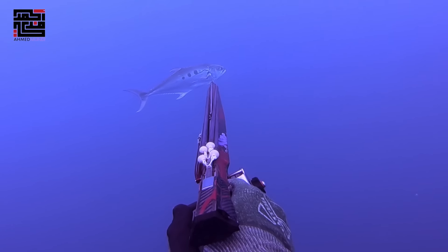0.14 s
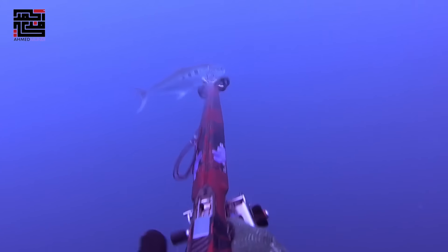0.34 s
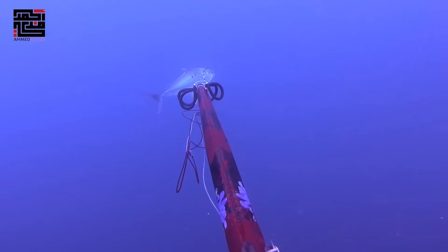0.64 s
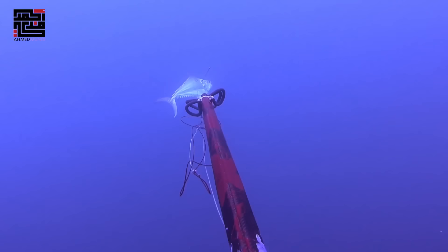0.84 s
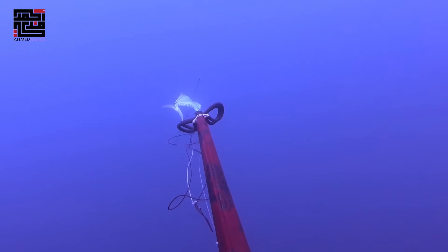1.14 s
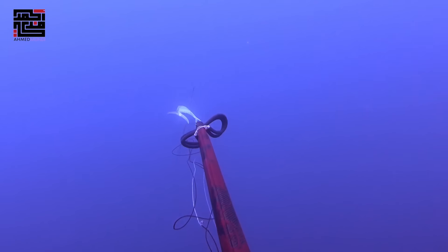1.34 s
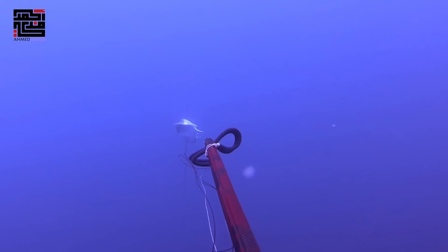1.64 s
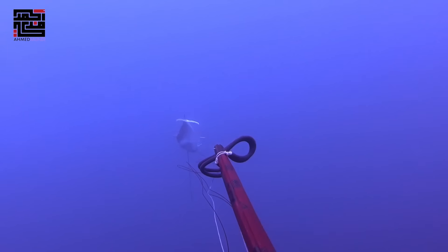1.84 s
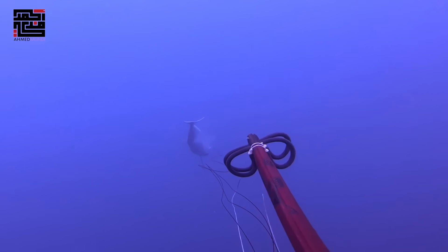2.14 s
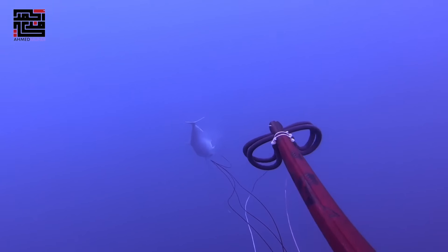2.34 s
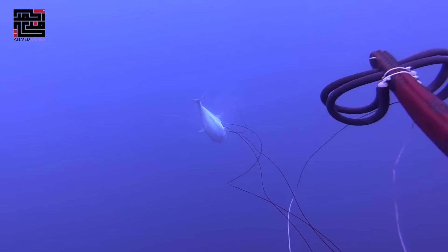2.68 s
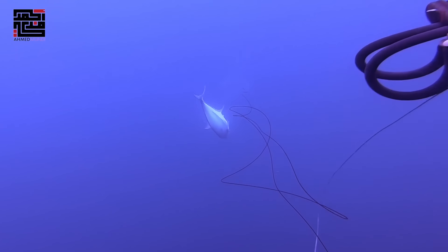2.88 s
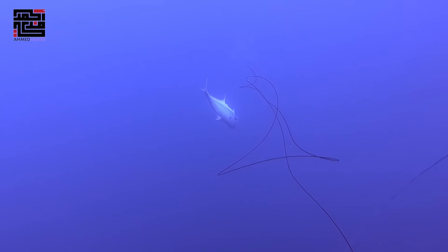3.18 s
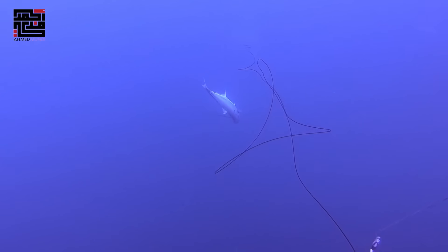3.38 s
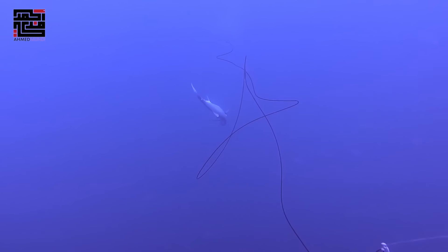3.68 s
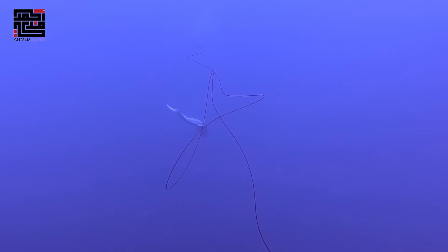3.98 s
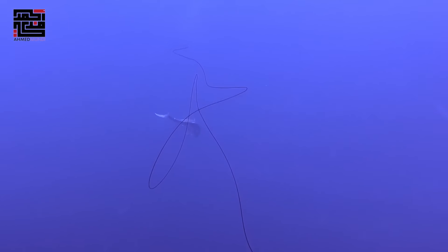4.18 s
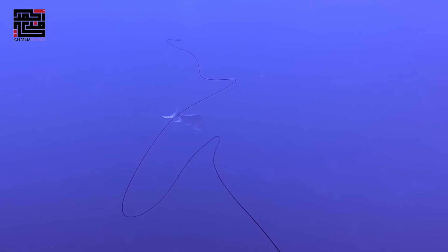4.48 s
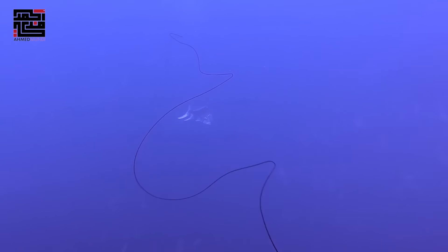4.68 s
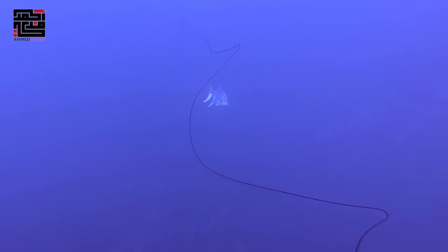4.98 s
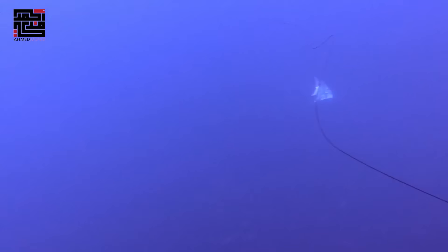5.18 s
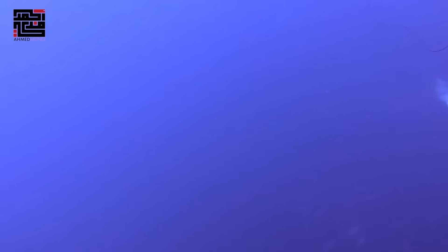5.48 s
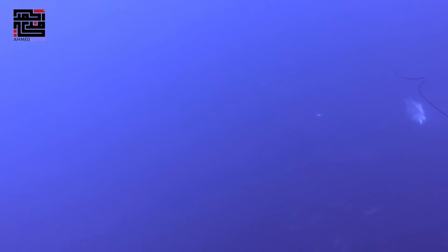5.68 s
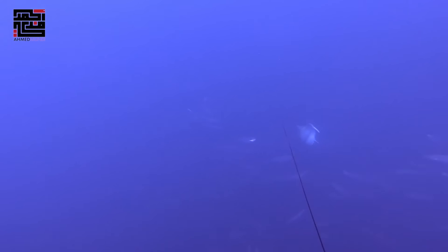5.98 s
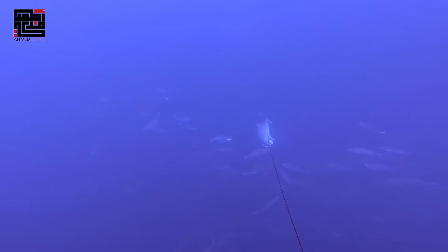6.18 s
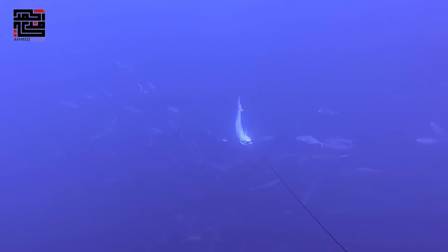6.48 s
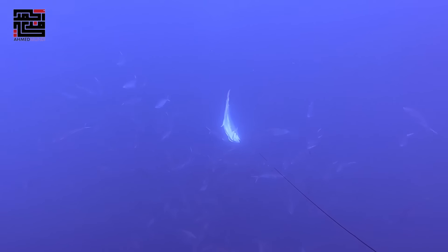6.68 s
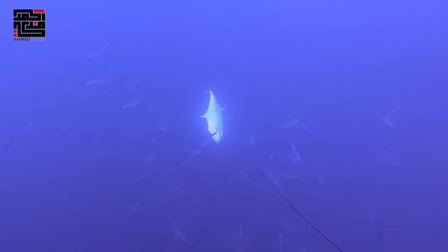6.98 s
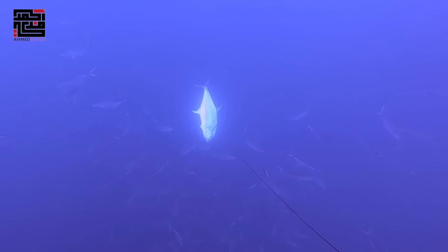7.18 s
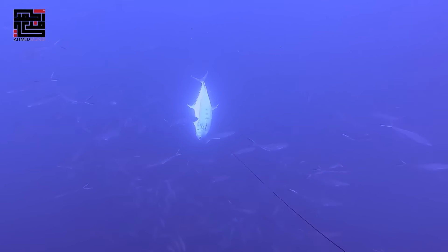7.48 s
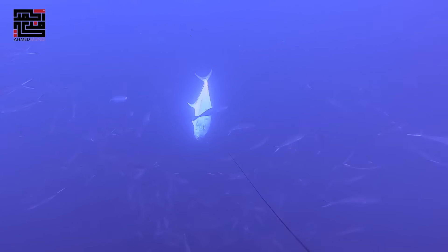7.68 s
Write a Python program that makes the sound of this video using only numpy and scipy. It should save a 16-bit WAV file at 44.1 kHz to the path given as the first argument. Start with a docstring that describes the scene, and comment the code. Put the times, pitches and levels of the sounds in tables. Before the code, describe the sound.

A speargun's abrupt recoil thump opens a muffled underwater hush, followed by sparse housing knocks, a sharp clack near 4.6 seconds, and tiny ticking clicks.

```python
"""A speargun has just fired under water, heard inside a diver's sealed camera housing with two microphone ports.
First the recoil thuds (sudden low waves) and rattles (noise that dies fast) over a thin crackling hiss.
Then the line and gear tap, snap, scrape and squeak, most busily from about 4 to 6 s. Blows and noise ring the
housing's modes, short and partly opposed between the ports. Throughout, slow waves and low noise press on
the ports, small bubbles slip past in gliding rings, and distant clicks come back off the surface."""
import sys
import numpy as np
from scipy import signal
from scipy.fft import rfft, irfft
from scipy.io import wavfile
from scipy.ndimage import uniform_filter1d

SR = 44100
rng = np.random.default_rng(int(sys.argv[2]) if len(sys.argv) > 2 else 0)


def unload_wav(signal):
    """Save mono or channel-first audio to the path in sys.argv[1] as 16-bit WAV at rate SR, clipped to [-1, 1]."""
    wavfile.write(
        sys.argv[1],
        SR,
        np.round(np.clip(np.atleast_2d(signal).T, -1, 1) * 32767).astype(np.int16),
    )


N = 345303  # length [samples]


def undb(db):
    """Turn decibels into an amplitude factor."""
    return 10 ** (np.asarray(db) / 20)


def curves(table):
    """Join the columns of a table by straight lines in time."""
    columns = np.transpose(table)
    return [np.interp(np.arange(N) / SR, columns[0], c) for c in columns[1:]]


def walk(rate):
    """Wander at random: levels held 1 / rate s, then smoothed twice; spread near 1."""
    hold = int(SR / rate)
    held = rng.standard_normal(4000)[np.arange(N) // hold]
    return 1.82 * uniform_filter1d(uniform_filter1d(held, hold), hold)


def band(lo_hz, hi_hz, like):
    """Stereo noise between two pitches, rms 1; `like` is the left-right correlation (-1 is opposed)."""
    sos = signal.butter(4, [lo_hz, hi_hz], "bandpass", fs=SR, output="sos")
    mid, side = signal.sosfilt(sos, rng.standard_normal((2, N)))
    pair = np.sqrt(1 + like) * mid + np.sqrt(1 - like) * side * np.array([[1], [-1]])
    return pair / pair.std()


def crackle(per_s, spread_db, burst_s):
    """Clicks of tiny bubbles and grit that come in flurries, a few much larger than the rest; rms 1."""
    when = rng.random(N) < per_s / SR * undb(3.5 * walk(16.0))
    size = rng.exponential(size=N)
    clicks = when * undb(spread_db * np.minimum(size, 3))
    # each click is a short rough burst
    clicks = signal.lfilter([1], [1, -np.exp(-1 / (burst_s * SR))], clicks) * rng.standard_normal(N)
    return clicks / clicks.std()


# fade time of a contact: a fixed part [s] plus so many cycles of its pitch
CONTACT_S, CONTACT_CYCLES = 0.0013, 0.81


def blows(table, hz, grits, slope_db, rough):
    """Short contacts push the mode at hz; one loses slope_db per octave away from its favoured pitch."""
    push, t = np.zeros(N), np.arange(grits.shape[1]) / SR
    for (s, level_db, near_hz), grit in zip(table, grits):
        fade = np.exp(-t / (CONTACT_S + CONTACT_CYCLES / near_hz))
        tone = 2 * np.sin(2 * np.pi * near_hz * t) / fade.sum()
        burst = fade * (tone + rough * grit / np.linalg.norm(fade))
        i = int(s * SR)
        gain = undb(level_db - slope_db * abs(np.log2(hz / near_hz)))
        push[i:i + len(t)] += (gain * burst)[:N - i]
    return push


def press(table, sudden):
    """Water shoved against the ports: a few cycles under a bell-shaped swell, or with a sudden front."""
    out = np.zeros((2, N))
    for s, hz, cycles, left_db, right_db in table:
        t = np.arange(N) / SR - s
        if sudden:
            swell = np.exp(-(t * hz / cycles) ** 4) * (t > 0)
        else:
            swell = np.exp(-(2 * t * hz / cycles) ** 2)
        out -= undb([[left_db], [right_db]]) * swell * np.sin(2 * np.pi * hz * t)
    return out


# ways the housing rings: (pitch [Hz], width [Hz], level of its steady noise [relative dB],
# answer to blows [relative dB], left minus right [dB], right port's phase lead [rad])
HOUSING = [(380, 170, -22.5, -4, 1.5, 5), (750, 73, -15.5, -10.5, -11.5, -1.0),
           (857, 144, -3, -7, -5, -2.5), (949, 140, -11, 2, -5.5, -1.5),
           (1176, 51, -6.5, -10.5, -3.5, -2.0), (1242, 59, 0.5, 8.5, 3.5, -2.5),
           (1521, 115, -4.5, -3, -2.5, 3.5), (1814, 170, -11, -7.5, -3.5, -0.5),
           (1961, 84, -12.5, 0.5, 3.5, -1.5), (2340, 300, -20.5, -31, 1.5, 2), (2624, 190, -22.5, -8, 4, 5),
           (3013, 166, -24, -1.5, 3, 2), (3460, 610, -22.5, -19, -1, 0.97), (3957, 530, -23, -30, 3, 1.5),
           (4240, 480, -21, -19, -2, 3.5), (5640, 460, -19.5, 9.5, 4, 2.03), (6520, 550, -15.5, -3, 2.5, 2),
           (7750, 770, -26, -16, 1, 0.8)]
# levels of hum and hiss over time, with one abrupt drop at 2.27 s:
# (time [s], hum level [relative dB], hiss level [relative dB])
HUM_AND_HISS = [(0.0, -54.5, -59), (0.09, -61.5, -79), (0.23, -64, -82), (0.43, -69, -83.5),
                (0.68, -69.5, -85), (1.05, -64.5, -79), (1.4, -64.5, -73.5), (1.5, -59, -75),
                (1.78, -62, -75.5), (2.1, -61.5, -75.5), (2.19, -62.5, -71.5), (2.268, -54, -71),
                (2.273, -71.5, -81), (2.34, -64, -80), (2.4, -67.5, -76.5), (2.86, -58, -74.5),
                (3.35, -62.5, -76.5), (3.45, -56, -70), (3.56, -59.5, -71), (3.7, -55, -72),
                (3.76, -59.5, -74), (3.86, -60, -70), (4.5, -58, -70.5), (4.97, -55.5, -71.5),
                (5.4, -56.5, -75), (5.8, -59, -71), (6.27, -59, -72.5), (6.55, -63.5, -77.5),
                (7.0, -60.5, -72.5), (7.26, -60, -73), (7.55, -55.5, -69.5), (7.83, -59, -74)]
# modes from 2.5 to 5 kHz follow the hiss, and more while the line runs: (time [s], level above hiss [relative dB])
RUBBING = [(0.1, 18), (1.3, 13), (3.4, 13.5), (3.7, 19), (5.3, 18), (6.35, 17), (6.5, 13.5), (7.83, 8.5)]


def housing():
    """Every mode hums with steady noise and rings with the blows; the ports hear it in different phases."""
    tap_grit = rng.standard_normal((len(TAPS), 2048))
    snap_grit = rng.standard_normal((len(SNAPS), 2048))
    far = distant_clicks()
    far_grit = rng.standard_normal((len(far), 512))
    scatter, shimmer, stir = tails(), walk(22.0), walk(14.0)
    hum_db, hiss_db = curves(HUM_AND_HISS)
    rub_db = hiss_db + curves(RUBBING)[0]
    coarse, fine = crackle(60.0, 2.8, 0.0022), crackle(140.0, 6.1, 0.00097)
    fine = fine + undb(-2.5) * np.roll(fine, int(ECHO_S * SR))  # the crackle has an echo too
    stutter = undb(3.5 * walk(260.0))  # rubbing sticks and slips
    rattle, grit = release(), crackle(250.0, 1.5, 0.00067)
    out = np.zeros((2, N))
    for hz, width_hz, steady_db, blow_db, pan_db, lead in HOUSING:
        if hz < 2500:
            base_db, grain, unsteady_db = hum_db + 2.0, 0.5 * coarse, 2.2
        elif hz < 5000:
            base_db, grain, unsteady_db = rub_db, 0.63 * coarse + 0.5 * fine, 0.8
        else:
            base_db, grain, unsteady_db = hiss_db + 14.0 + 0.44 * shimmer, fine, 0.8
        steady = rng.standard_normal(N) + grain
        steady *= undb(base_db + steady_db + 1.2 * stir + unsteady_db * walk(20.0))

        thin_db = -18.0 * max(np.log2(1150 / hz), 0)  # the rattle hardly reaches the lowest modes
        rattle_gain = undb(-5.0 * abs(np.log2(hz / 1700)) + thin_db + blow_db / 2)
        rub = rattle * rattle_gain * rng.standard_normal(N)
        rub += friction(hz) * (0.68 * stutter * rng.standard_normal(N) + grit)
        rub += scatter * undb(-12.0 * abs(np.log2(hz / 6000))) * rng.standard_normal(N)

        hits = undb(blow_db / 2 + 4.0) * blows(TAPS, hz, tap_grit, 14.8, 0.39)
        hits += undb(0.13 * blow_db + 0.5) * blows(SNAPS, hz, snap_grit, 12.5, 0.65)
        hits += undb(8.0) * blows(far, hz, far_grit, 14.2, 0.53)

        pole = np.exp((2j * np.pi * hz - np.pi * width_hz) / SR)
        noise_gain = np.sqrt(2 - 2 * abs(pole) ** 2)  # a narrow mode would otherwise hum louder
        ring = signal.lfilter([1], [1, -pole], (steady + rub) * noise_gain + hits)
        # the thick wall passes little away from the resonance
        broad = np.exp((2j * np.pi * hz - 4.0 * np.pi * width_hz) / SR)
        ring = signal.lfilter([1 - abs(broad)], [1, -broad], ring)
        left = undb(pan_db / 2) * ring.imag
        right = undb(-pan_db / 2) * (ring * np.exp(1j * lead)).imag
        out += [left, right]
    return out + top_hiss(fine, hiss_db, shimmer, far, far_grit, snap_grit)


# three clacks of the release that die fast: (time [s], level [relative dB])
CLACKS = [(0, -32.5), (.008, -42), (0.017, -50)]
CLACK_DB_PER_S = -1800
# faint jitter of loose parts: steady at first [relative dB], then fading from a time [s] at a rate [dB/s]
JITTER_DB, JITTER_FADES_AT_S, JITTER_DB_PER_S = -70, 0.2, -190


def release():
    """Level of the rattle after the trigger: clacks plus the jitter of loose parts."""
    t = np.arange(N) / SR
    clacks = sum(undb(db + CLACK_DB_PER_S * np.abs(t - s)) * (t >= s) for s, db in CLACKS)
    return clacks + undb(JITTER_DB + JITTER_DB_PER_S * np.maximum(t - JITTER_FADES_AT_S, 0))


# shoves that start at once, the recoil first:
# (start time [s], pitch [Hz], length [cycles], left level [dB], right level [dB])
JOLTS = [(-.003, 46, 1.02, -22.5, -9), (.022, 74, 0.55, -13, -22), (4.426, 45.5, 2.8, -21, -24.5),
         (4.426, 200, 1.4, -47, -31), (4.638, 37.8, 2.4, -25, -22.5), (4.652, 186, 2.4, -41, -31.5),
         (4.445, 93, 1.6, -38, -31), (5.077, 380, 0.38, -49, -36), (6.193, 207, 3.3, -40, -65),
         (6.22, 218, 1.4, -40, -65), (6.255, 200, 1.7, -40.5, -55), (6.582, 76, 1.9, -47, -49),
         (6.583, 178, 1.3, -41, -35)]


def jolts():
    """Sudden shoves of water: each wave starts at once and dies after its few cycles."""
    return press(JOLTS, sudden=True)


# dull taps on the housing, played by blows() in housing(): (time [s], level [relative dB], favoured pitch [Hz])
TAPS = [(0.007, -28.5, 1810), (0.007, -26, 1190), (0.019, -39, 1690), (0.056, -36.5, 1220),
        (0.148, -48, 1780), (0.152, -35, 1260), (0.276, -43, 940), (0.345, -46.5, 1160),
        (0.372, -44.5, 1530), (0.728, -44, 1110), (1.008, -42, 1430), (1.455, -34.5, 707),
        (1.585, -43.5, 1280), (1.995, -43.5, 1940), (2.199, -49, 1980), (2.207, -33.5, 1660),
        (2.217, -39.5, 1220), (2.248, -42, 1270), (2.688, -38, 716), (2.818, -44, 1270),
        (3.228, -44.5, 1915), (3.44, -35, 1840), (3.441, -37.5, 1230), (3.485, -42.5, 1230),
        (3.658, -46, 1820), (3.711, -46, 1850), (4.205, -35.5, 1830), (4.292, -28, 1430),
        (4.386, -36.5, 1900), (4.624, -35, 1210), (4.647, -16.5, 1406), (4.766, -39.5, 1290),
        (5.01, -31, 1190), (5.078, -29.5, 1103), (5.172, -35.5, 1390), (5.276, -42, 1250),
        (5.346, -37, 1340), (5.497, -34.5, 1600), (5.769, -40, 1870), (5.808, -37, 1740),
        (5.921, -39, 1200), (6.895, -36, 1175), (7.067, -28.5, 806)]
# bright snaps of line and gear close by, played likewise: (time [s], level [relative dB], favoured pitch [Hz])
SNAPS = [(0.007, -24, 5360), (0.0562, -39.5, 3030), (0.076, -42, 5500), (0.15, -44, 2980),
         (0.183, -51, 3000), (0.2403, -30.5, 5000), (0.249, -45, 4100), (1.178, -45.5, 5430),
         (3.6117, -35, 3930), (4.275, -39, 3420), (4.387, -36.5, 3730), (4.6477, -18.5, 3220),
         (4.7428, -36, 3620), (4.777, -38, 3700), (4.857, -38.5, 3520), (4.9462, -40, 2320),
         (5.0223, -34, 2280), (5.147, -42, 3530), (5.24, -36, 7200), (5.9212, -31, 4640),
         (6.158, -43, 3920), (6.3937, -37, 3870), (7.0222, -48, 2540), (7.286, -45.5, 3180),
         (7.0693, -43, 3130)]
# line and glove scraping along the housing:
# (start time [s], end time [s], favoured pitch [Hz], narrowness [dB per octave], level [relative dB])
SCRAPES = [(0.126, 0.143, 5900, 29, -60.5), (2.19, 2.266, 1750, 12, -63.5), (3.42, 3.515, 1800, 15, -63),
           (3.572, 3.692, 1870, 31, -63), (3.802, 3.887, 2050, 30, -60), (4.056, 4.094, 4100, 23, -61),
           (4.136, 4.19, 1780, 58, -56), (4.164, 4.194, 3770, 22, -59), (4.255, 4.36, 2900, 34, -60),
           (4.642, 4.683, 3570, 12, -53.5), (4.686, 4.76, 2970, 9, -63), (4.768, 4.801, 3480, 25, -56),
           (5.016, 5.049, 3200, 19, -53), (5.99, 6.062, 1025, 50, -52.5), (6.127, 6.177, 1130, 34, -48.5),
           (5.158, 5.208, 3400, 21, -64.5), (5.23, 6.396, 4160, 76, -64.5), (6.19, 6.358, 3950, 67, -66.5),
           (5.971, 5.996, 3400, 11, -60.5)]


def friction(hz):
    """Level of the scraping that drives the mode at hz; each scrape is a rounded swell."""
    level = np.zeros(N)
    for start_s, end_s, near_hz, slope_db, level_db in SCRAPES:
        i = slice(int(start_s * SR), int(end_s * SR))
        gain = undb(level_db - slope_db * abs(np.log2(hz / near_hz)))
        level[i] += gain * np.hanning(i.stop - i.start) ** 0.3
    return level


# the wet line squeaks as it slips:
# (start time [s], length [s], first pitch [Hz], last pitch [Hz], left level [dB])
SQUEAKS = [(3.84, 0.015, 1720, 2110, -47), (4.086, 0.011, 4330, 4300, -59), (4.159, 0.017, 3400, 3640, -56),
           (4.171, 0.024, 3260, 3180, -57.5), (4.279, 0.028, 2970, 2870, -56),
           (4.317, 0.02, 2680, 2730, -54.5)]


def squeaks():
    """The slipping line sings short, wavering, sliding tones, louder at the right port."""
    out, waver = np.zeros(N), walk(330.0)
    for start_s, length_s, from_hz, to_hz, level_db in SQUEAKS:
        i = slice(int(start_s * SR), int((start_s + length_s) * SR))
        hz = np.linspace(from_hz, to_hz, i.stop - i.start) * (1 + 0.0067 * waver[i])
        out[i] += undb(level_db) * np.hanning(len(hz)) * np.sin(2 * np.pi * np.cumsum(hz) / SR)
    return np.array([out, 1.35 * out])


# slow pressure thumps and soft knocks on the ports:
# (centre time [s], pitch [Hz], length [cycles], left level [dB], right level [dB])
THUMPS = [(.065, 27, 2.1, -30, -17), (.099, 62, 0.83, -15, -24.5), (.13, 23, 2.2, -37, -25.5),
          (.61, 162, 2.9, -69, -53), (1.40, 210, 1.55, -65, -42.5), (2.2, 27, 1.5, -43, -38.5),
          (2.633, 204, 1.6, -64, -42.5), (3.25, 21, 1.5, -45, -42), (3.558, 34.4, 2, -35, -32.5),
          (3.632, 26.6, 1.03, -29.5, -25.5), (3.69, 200, 3.8, -59, -44), (4.097, 24.6, 0.33, -20, -26),
          (4.48, 134, 1.5, -42, -37), (4.632, 170, 2, -40, -38), (4.706, 51, 1.8, -29, -21.5),
          (4.731, 172, 2.4, -39, -33.5), (4.771, 43, 1.36, -30.5, -29.5), (5.302, 14.6, 2.1, -37, -29.5),
          (5.81, 184, 2.5, -47, -48), (6.329, 10.2, 0.96, -7, -63), (6.789, 31.5, 2.4, -41, -36),
          (6.898, 21.8, 2, -34, -29), (7.535, 178, 1.8, -38, -66)]


def thumps():
    """Water presses on the ports: each wave swells and sinks smoothly over its few cycles."""
    return press(THUMPS, sudden=False)


def bubbles(count=380):
    """Small bubbles slipping past: short rings that glide up, opposed at the ports, louder with the hum."""
    out, hum_db = np.zeros(N), curves(HUM_AND_HISS)[0]
    t = np.arange(2048) / SR
    for place, pitch, size in rng.random((count, 3)):
        i, hz = int(place * (N - len(t))), 700 * 2 ** (1.6 * pitch)
        glide = np.sin(2 * np.pi * hz * t * (1 + 9.7 * t))
        ring = glide * np.exp(-t * hz / 10.0) * np.minimum(t / 0.0013, 1)
        out[i:i + len(t)] += undb(hum_db[i] + 5.5 + 4.5 * size) * ring
    return np.array([out, -0.7 * np.roll(out, 4)])


# rumble at the ports: (time [s], level before wandering and lean [dB])
RUMBLE = [(0.2, -42.5), (0.55, -57.5), (0.9, -57), (1.66, -63), (2.17, -49.5), (2.66, -66), (3.17, -60.5),
          (3.56, -45), (4.0, -38.5), (4.3, -43.5), (4.47, -36), (4.58, -41), (4.66, -43), (4.83, -44.5),
          (5.3, -44), (6.2, -47), (6.32, -34), (6.5, -52), (7.0, -51.5), (7.83, -52)]
# which port the rumble leans to: (time [s], left minus right [dB])
LEAN = [(0, -3), (3, -6.5), (4.5, -4), (5.6, -0.5), (6.0, -2), (6.5, 7), (6.8, -8), (7.83, -7)]


def rumble():
    """Very low noise of water pressing on the ports, wandering in level and leaning left or right."""
    pan_db = curves(LEAN)[0]
    level_db = curves(RUMBLE)[0] + np.array([pan_db, -pan_db]) / 2
    return band(6.6, 44.2, 0.38) * undb(level_db + 2.0 * walk(7.8))


# eddies passing the ports:
# (centre time [s], half width [s], gurgle level [relative dB], rush level [relative dB])
EDDIES = [(0.18, 0.065, -67.5, -59.5), (3.65, 0.074, -70, -56.5), (4.108, 0.015, -51, -76),
          (4.45, 0.035, -50, -78), (4.681, 0.053, -51, -64), (5.07, 0.04, -74, -70),
          (5.45, 0.026, -54, -67), (5.809, 0.029, -50, -84), (6.17, 0.17, -59.5, -64),
          (6.591, 0.029, -55, -55), (7.1, 0.082, -57, -85)]
# levels between eddies [relative dB] when the hum is at CALM_DB, and the share of the hum's changes they follow
GURGLE_DB, RUSH_DB, CALM_DB, FOLLOW = -63.5, -69, -60, 0.77


def eddies():
    """Eddies swell a low gurgle and, above it, a rush that is opposed between the ports; both are lumpy."""
    t = np.arange(N) / SR
    hum = undb(FOLLOW * (curves(HUM_AND_HISS)[0] - CALM_DB))
    gurgle, rush = hum * undb(GURGLE_DB), hum * undb(RUSH_DB)
    for s, width_s, gurgle_db, rush_db in EDDIES:
        swell = np.exp(-((t - s) / width_s) ** 2)
        gurgle = gurgle + undb(gurgle_db) * swell
        rush = rush + undb(rush_db) * swell
    gurgle = band(126.0, 243.0, -0.23) * gurgle * undb(1.64 * walk(19.0))
    rush = band(246.0, 505.0, -0.88) * rush * undb(2.7 * walk(25.0))
    return gurgle + rush


# distant clicks in the water, each heard again off the surface:
# (time [s], level [relative dB], favoured pitch [Hz], echo level relative to the click [dB])
CLICKS = [(0.3425, -56, 6750, -13), (0.5831, -51.5, 5600, -13), (0.7821, -50, 4960, -2),
          (0.831, -51, 5410, -14), (1.004, -46.5, 5730, -11), (1.1544, -52, 5400, -3),
          (1.2418, -51, 6540, -8), (1.3974, -54, 6400, -1), (1.742, -54, 5700, -10),
          (2.0283, -51, 6200, -13), (2.1266, -53, 6570, 3), (2.389, -54, 5540, -6),
          (2.4104, -53.5, 5400, -9), (2.4754, -52, 6600, -9), (2.6308, -55, 6460, 2),
          (2.8963, -61, 6450, -13), (2.9761, -53, 5640, -17), (3.263, -49, 5500, -10),
          (3.3596, -50, 6300, -5), (3.4076, -51, 6310, -8), (3.5284, -41.5, 5600, -10),
          (3.5725, -37.5, 5350, -5), (3.768, -46, 5600, -12), (3.9065, -47, 8300, 0.5),
          (4.7152, -54, 6540, -10), (4.795, -45.5, 6440, -5), (5.3018, -48, 6450, -22),
          (5.696, -54, 7920, 8), (5.8662, -38, 6600, -17), (6.1464, -49, 6700, -8), (6.2392, -47, 6200, -6),
          (6.3445, -48, 4620, -4), (6.438, -50, 6800, -6), (6.467, -47.5, 6100, -10),
          (6.6717, -48, 5500, -8), (6.712, -48, 5200, -14), (6.7356, -49, 6440, -5),
          (6.8397, -52, 5700, -8), (6.8736, -43, 6800, -6), (7.0373, -41, 5870, -16),
          (7.235, -52, 5600, -11), (7.3564, -48, 5900, 1.5), (7.5343, -50, 5540, -13),
          (7.57, -57, 6700, -8), (7.6104, -49, 6950, -18), (7.644, -49, 7000, -7), (7.7228, -52, 6200, 0),
          (7.7518, -44.5, 6600, -19)]
ECHO_S = 0.0091  # delay off the surface
TAIL_DB, TAIL_S = -21, 0.024  # scattered tail after a click: level [relative dB] and fade time [s]


def distant_clicks():
    """List every distant click, then its second arrival off the surface, as blows."""
    direct = [row[:3] for row in CLICKS]
    echoes = [(s + ECHO_S, level_db + echo_db, hz) for s, level_db, hz, echo_db in CLICKS]
    return direct + echoes


def tails():
    """Level of the scattered hiss that dies away after each distant click."""
    kicks = np.zeros(N)
    for s, level_db, _, _ in CLICKS:
        kicks[int(s * SR)] = undb(level_db + TAIL_DB)
    return signal.lfilter([1], [1, -np.exp(-1 / (TAIL_S * SR))], kicks)


# tone colour of the top-end hiss: (pitch [Hz], gain [dB])
AIR = [(2500, -44), (5000, 2), (8500, 0), (9410, -6), (12600, -10), (13400, -11), (14100, -31)]
AIR_DB = 4.5  # added to the hiss level


def top_hiss(fine, hiss_db, shimmer, far, far_grit, snap_grit):
    """Thin hiss, unrelated between the ports, with the housing's crackle, snaps and distant clicks in it."""
    top = rng.standard_normal((2, N)) + 0.54 * fine
    top *= undb(hiss_db + AIR_DB + 0.9 * shimmer)
    top += undb(7.0) * blows(far, 9700.0, far_grit, 4.0, 0.7)
    top += undb(4.0) * blows(SNAPS, 9300.0, snap_grit, 4.1, 0.58)
    f, (point_hz, point_db) = np.fft.rfftfreq(N, 1 / SR), np.transpose(AIR)
    gain = undb(np.interp(np.log(f + 1), np.log(point_hz), point_db))
    return irfft(rfft(top) * gain, N)


def scene():
    """Add up the ringing housing and everything the ports hear directly."""
    return housing() + jolts() + squeaks() + thumps() + bubbles() + rumble() + eddies()


TOP_HZ = 14200


def record(dry):
    """The recorder cuts the top: a steep filter removes what lies above TOP_HZ."""
    return signal.sosfilt(signal.ellip(8, 0.2, 70, TOP_HZ, fs=SR, output="sos"), dry)


dry = scene()
out = record(dry)
unload_wav(out)
```